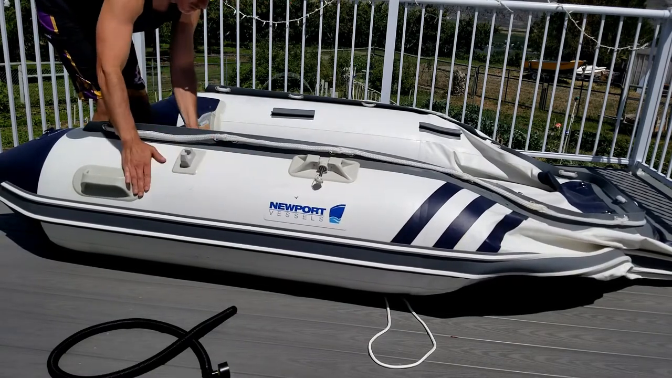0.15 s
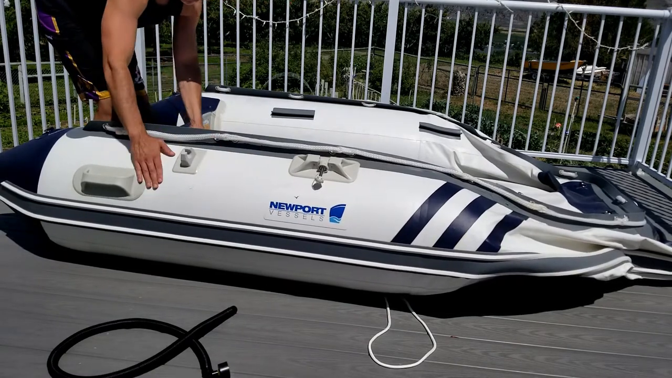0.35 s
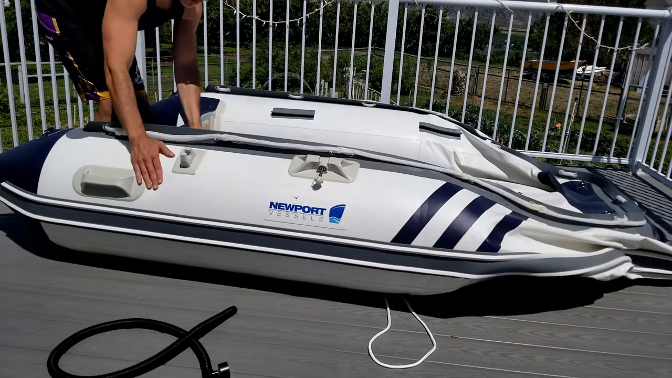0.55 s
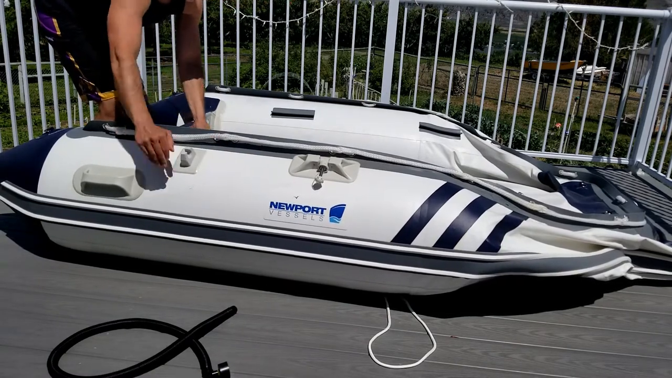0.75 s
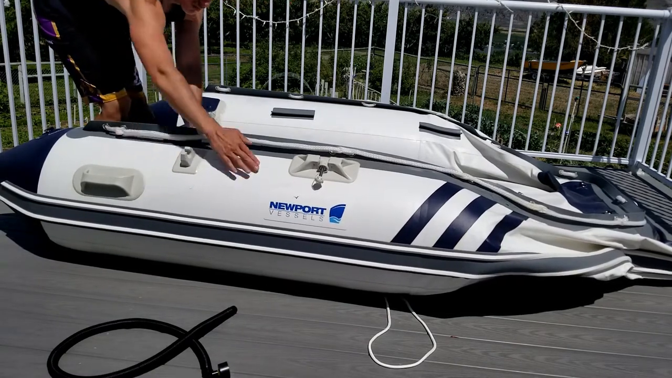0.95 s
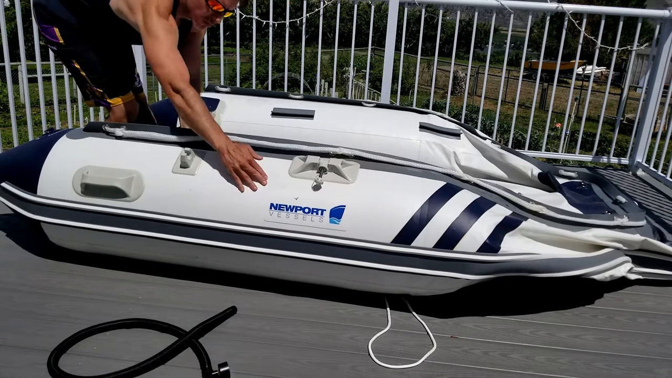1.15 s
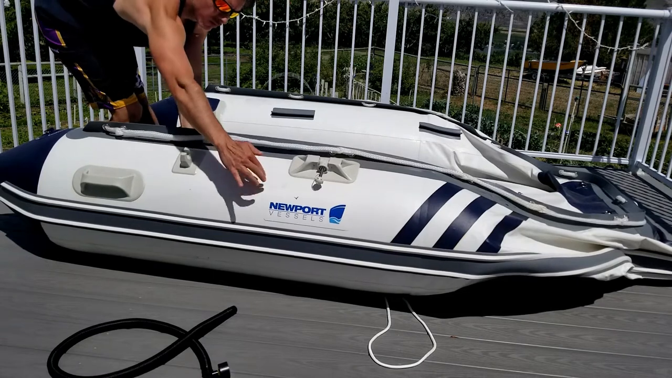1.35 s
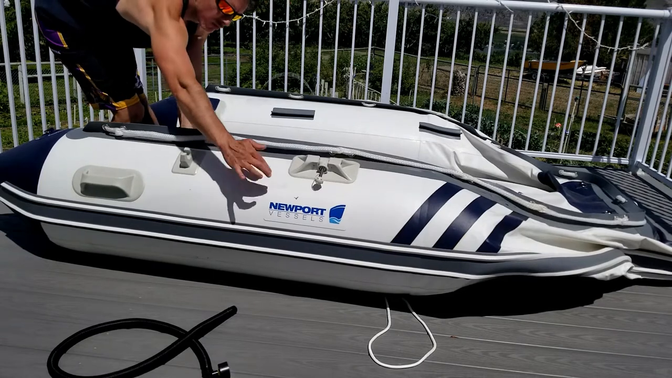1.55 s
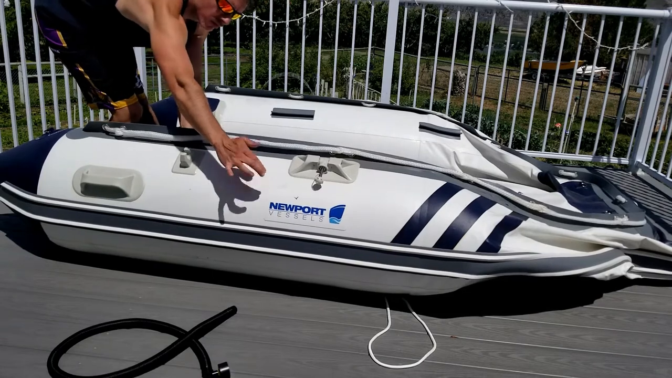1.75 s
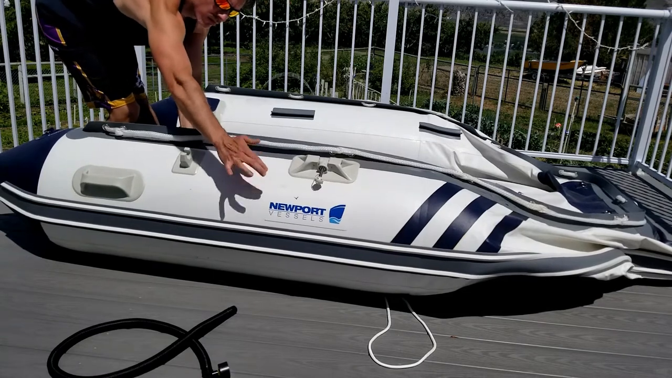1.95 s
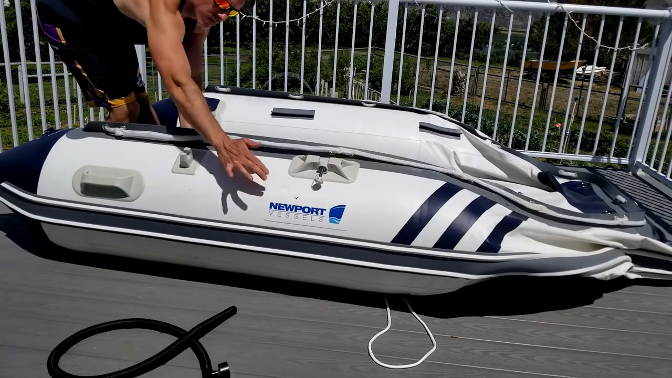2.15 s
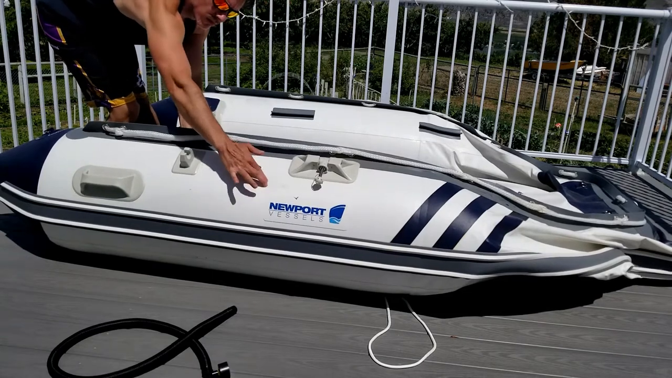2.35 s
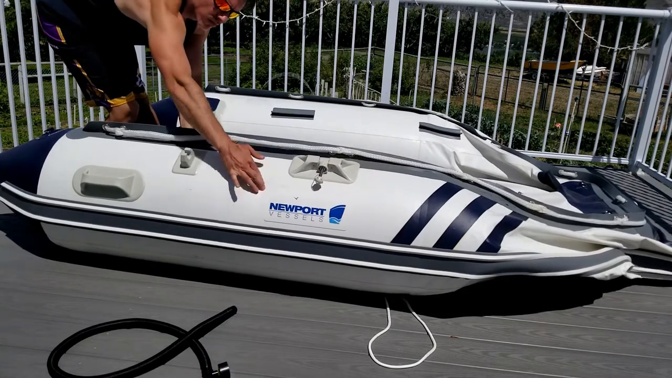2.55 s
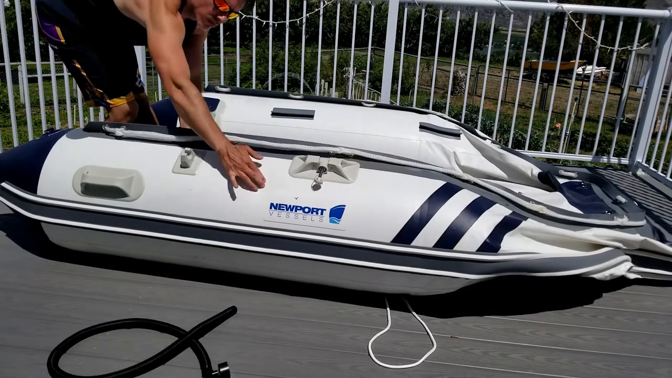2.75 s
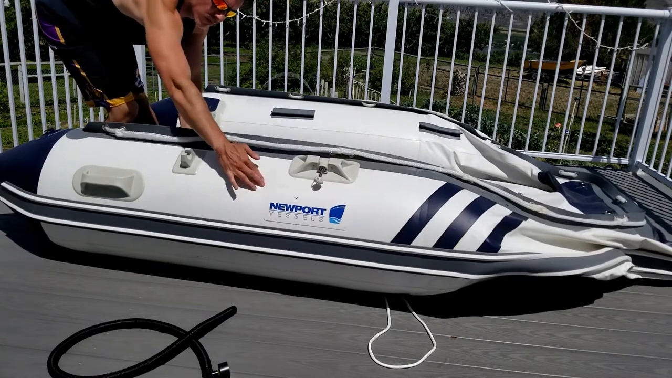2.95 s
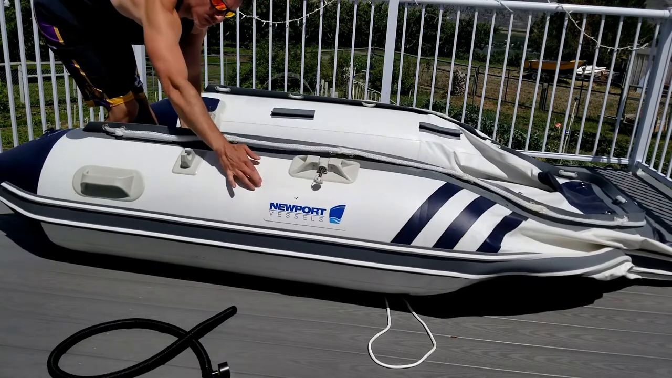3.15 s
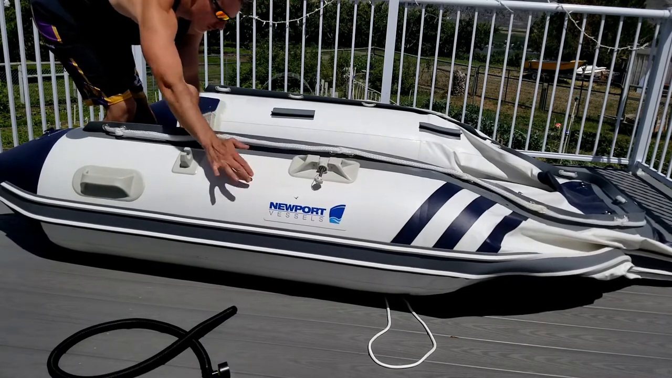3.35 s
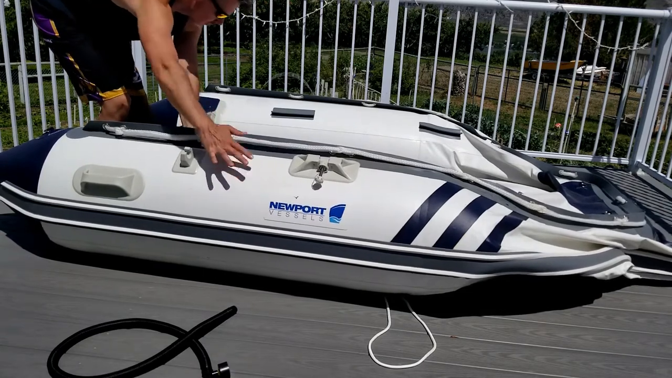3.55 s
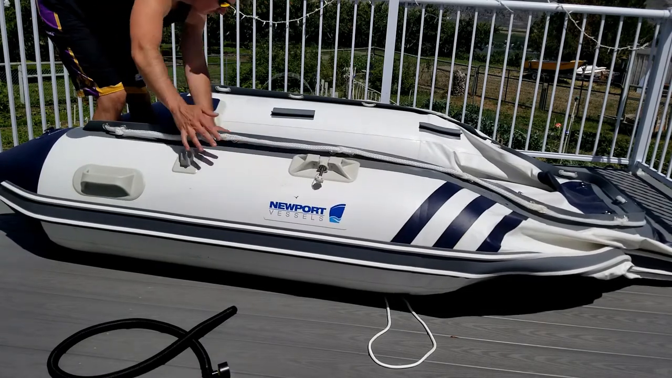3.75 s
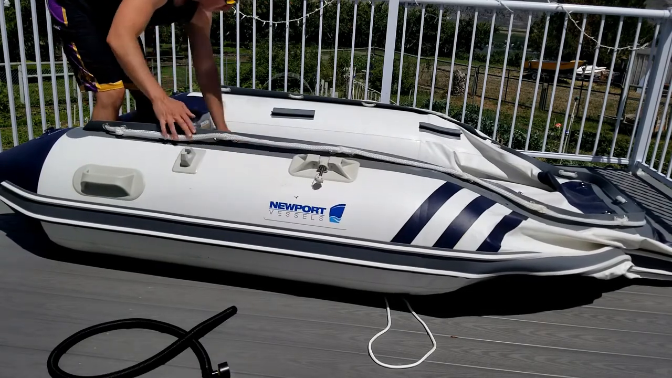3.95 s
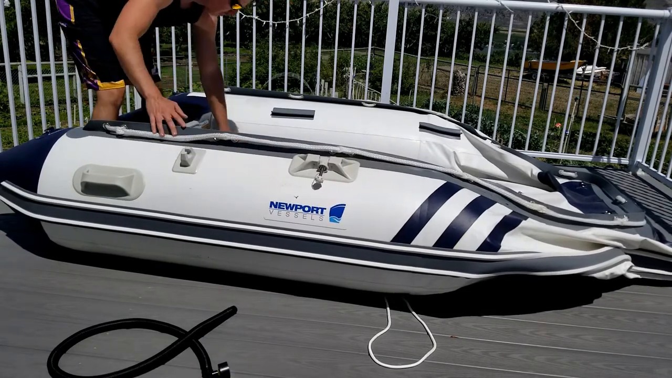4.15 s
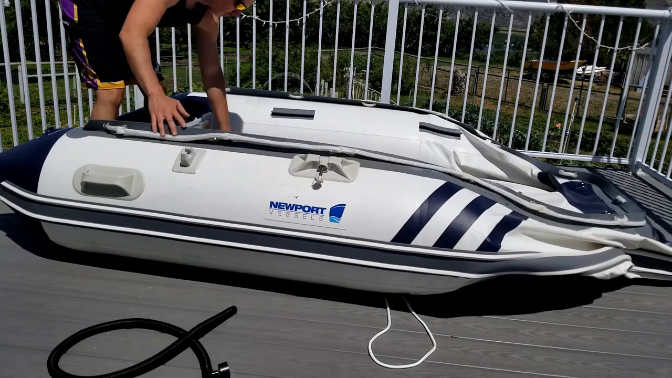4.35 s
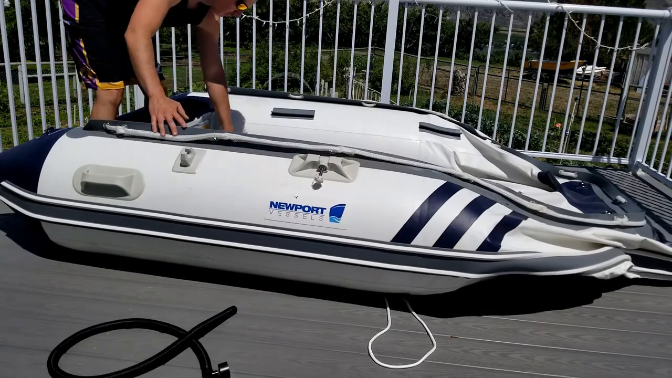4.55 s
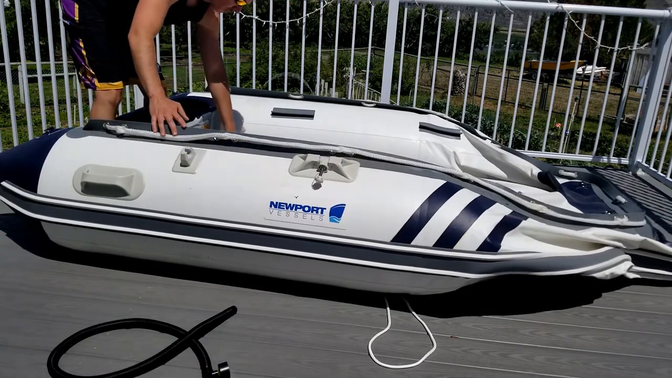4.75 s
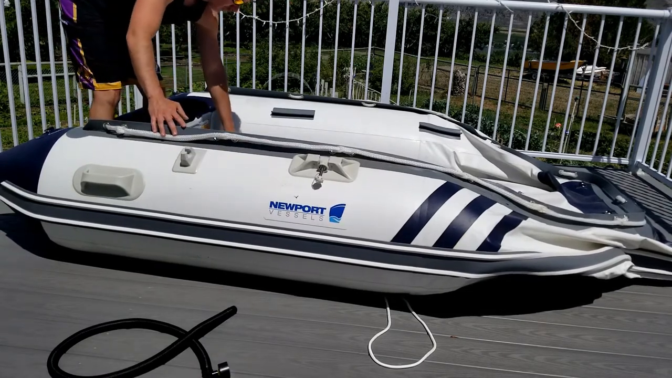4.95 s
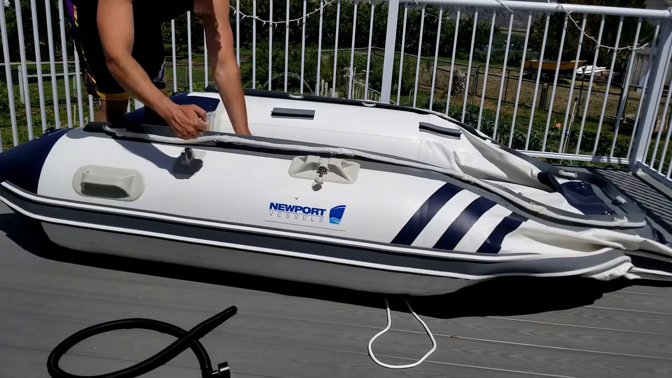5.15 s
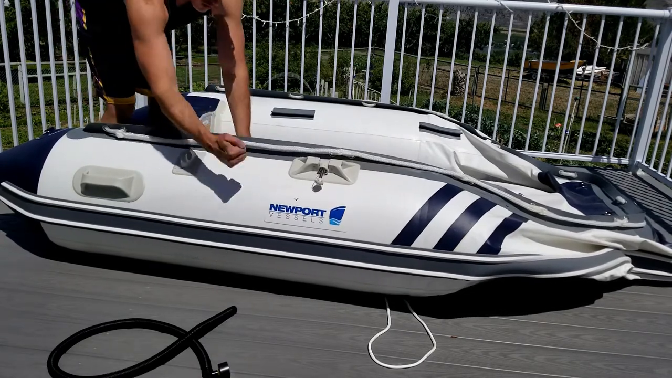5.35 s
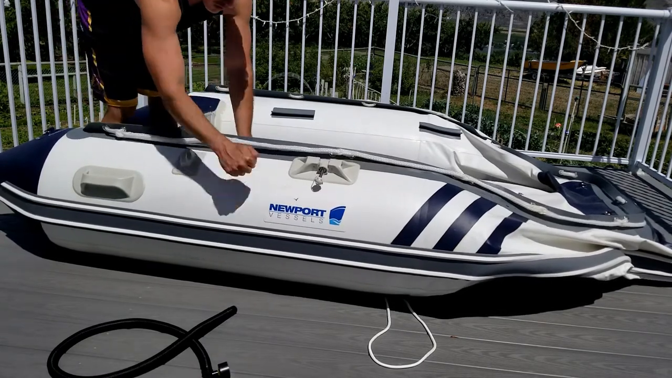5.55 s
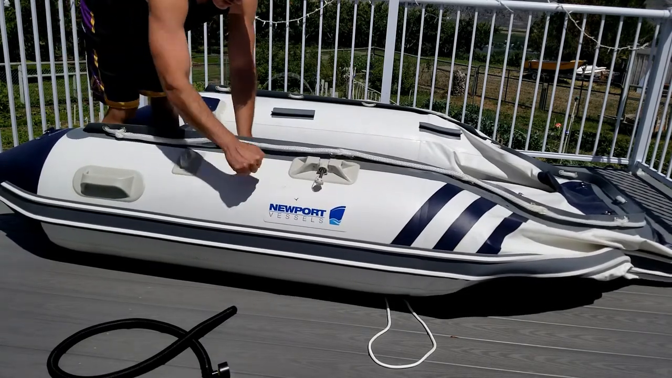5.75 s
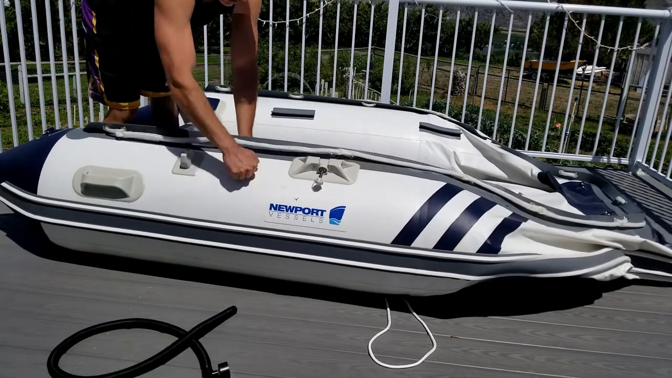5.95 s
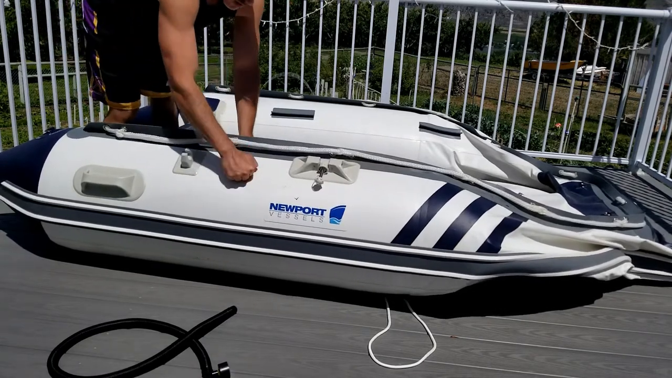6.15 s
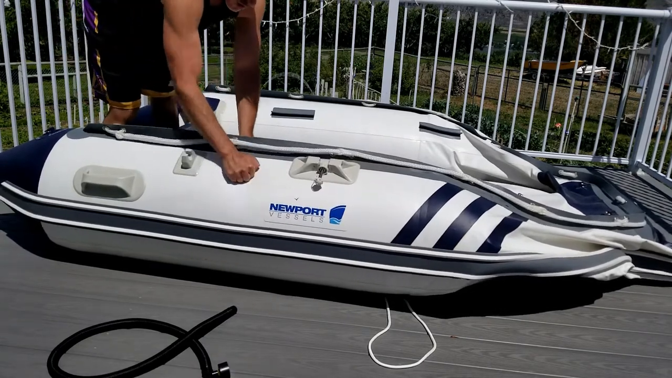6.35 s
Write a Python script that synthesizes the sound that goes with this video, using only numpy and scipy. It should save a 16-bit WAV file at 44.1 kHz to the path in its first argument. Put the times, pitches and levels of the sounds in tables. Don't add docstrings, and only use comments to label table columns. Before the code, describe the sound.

Outdoors on a deck, a small piston air pump buzzes loudly and evenly with a reedy, gritty tone. From about one second a hand pats a taut inflatable tube, roughly five times a second, with tiny metal clinks. The pump cuts off and slows into knocks. An abrupt change brings a faint muffled motor drone and five much louder, hollow fist slaps, with rattling fittings and a faint bird. Close stereo pickup, leaning left.

```python
import sys
import numpy as np
from scipy import signal
from scipy.fft import rfft, irfft, next_fast_len
from scipy.io import wavfile

SR = 44100
rng = np.random.default_rng(int(sys.argv[2]) if len(sys.argv) > 2 else 0)


def dump(signal):
    limited = np.clip(np.atleast_2d(signal).T, -1, 1)
    pcm = np.round(limited * 32767).astype(np.int16)
    wavfile.write(sys.argv[1], SR, pcm)


def volts_from_db(level):
    exponent = np.asarray(level, float) / 20
    return 10 ** exponent


N = 282681
CUT_S = 5.047
OFF_S = 4.71


# (time [s], rate [strokes/s])
PUMP_SPEED = [(0, 56.1), (.9, 56.15), (1.4, 56.09), (3.2, 56.06), (3.8, 56.11), (6.5, 56.1)]


def pump():
    coast_s = np.maximum(np.arange(N) / SR - OFF_S, 0)
    slowed = np.exp(-np.maximum(coast_s - .022, 0) / .42)
    pressure_loss_db = 14 * (1 - np.exp(-coast_s / .065))
    turn_rad = 2 * np.pi * np.cumsum(in_time(PUMP_SPEED)[0] * slowed + .06 * drift(6)) / SR
    stroke_db = -38 - pressure_loss_db - 20 * coast_s
    valve_db = -57.5 - 4 * coast_s
    tone = stroke_tone(turn_rad, coast_s, pressure_loss_db)
    return volts_from_db(stroke_db) * tone + volts_from_db(valve_db) * valve_hiss(turn_rad, slowed)


# (time [s], level [dB])
HAND_SHADE = [(0, -5.5), (.75, -5), (.95, 2), (2.2, 2.5), (3.65, 0), (4.2, 0), (4.71, -2.5)]


def stroke_tone(turn_rad, coast_s, pressure_loss_db):
    shade_db = in_time(HAND_SHADE)[0] + pressure_loss_db
    whine_db = 1 + 1.7 * pressure_loss_db - 400 * coast_s ** 2
    orders, levels_db = stroke_orders()
    valve_order, flank_lead_turns, thump_lead_turns = 13.8, .25, .3
    lead_turns = np.clip(.1 * (np.abs(orders - .5 - valve_order) - 1), 0, flank_lead_turns)
    lead_turns = np.where(orders < 6, thump_lead_turns, lead_turns * ((orders > 7) & (orders != 9)))
    phases = 2 * np.pi * np.cumsum(lead_turns)
    phases += 2 * np.pi * rng.random(len(orders)) * np.clip((orders - 19) / 12, 0, 1)
    shaded = (orders == 8) | (orders > 19) & (orders < 25)
    groups = shaded + 2 * (orders > 45)

    on = int((CUT_S + .01) * SR)
    group_gain = [np.ones(on), volts_from_db(shade_db[:on]), volts_from_db(whine_db[:on])]
    waver = [drift(4)[:on] for _ in range(11)]
    step, wave, tone = np.exp(1j * turn_rad[:on]), np.ones(on), np.zeros((2, N))
    for order, db, phase, group in zip(orders, levels_db, phases, groups):
        wave = wave * step
        waver_depth = min(.04 + .005 * order, .3)
        gain = volts_from_db(db) * group_gain[group] * (1 + waver_depth * waver[int(order) % 11])
        skew_rad, pan_db = min(order, 30) ** 2 * rng.standard_normal(2) * [.00035, .0022]
        side_phase = phase + np.array([[skew_rad], [-skew_rad]])
        sides = volts_from_db(pan_db * np.array([[1], [-1]])) * np.exp(1j * side_phase)
        sides *= 2 / np.abs(sides.sum())
        tone[:, :on] += sides.real * (gain * wave.real) - sides.imag * (gain * wave.imag)
    return tone


# (order [x stroke rate], level [dB])
LOW_ORDERS = [(1, -16), (2, -7), (3, -10), (4, -1), (5, -6), (6, -11), (7, -10), (8, -14), (9, -30),
              (10, -12), (11, -6), (12, -8), (13, -17), (14, 0), (15, -7), (16, -9), (17, -14), (18, -21),
              (19, -25), (20, -19), (21, -16), (22, -34), (23, -24), (24, -17), (25, -24), (26, -24),
              (27, -18), (28, -29), (29, -13.5), (30, -21)]


def stroke_orders():
    k = np.arange(31, 73)
    armature_db = 6.5 * ((k % 3 == 2) & (k < 45))
    db = np.maximum(-27.5 - 3 * (k - k[0]), -38.5) + armature_db
    db = db + 5 * np.exp(-((k - 57) / 4.5) ** 2)
    sideband = (k - 62) / 4
    db = np.where(sideband % 1 == 0, np.maximum(db, -27.5 - 3 * np.abs(sideband)), db)
    return np.transpose(list(LOW_ORDERS) + list(zip(k, db)))


# (frequency [Hz], density [dB/Hz])
VALVE_AIR = [(90, -4), (150, -6.5), (400, 0.5), (520, -12), (850, 4.5), (1100, -11.5), (1700, -3.5),
             (2600, -13.5), (3500, -11.5), (4300, -16.5), (7000, -19), (14000, -26.5), (15500, -38)]


def valve_hiss(turn_rad, slowed):
    hiss = banded_noise(VALVE_AIR, patchy_db=1.5) * volts_from_db(0.45 * np.cos(turn_rad - 1.1))
    hiss /= np.std(filtered(hiss[0], 2, [2500, 9000], "band"))
    top = filtered(hiss, 1, 3500, "high")
    return hiss - (1 - slowed ** 7) * top


# (time [s], peak [dB])
LAST_STROKES = [(4.74, -31), (4.76, -33), (4.779, -34), (4.799, -31), (4.824, -31), (4.849, -32),
                (4.873, -32), (4.899, -36), (4.932, -36), (4.957, -34), (4.992, -34), (5.029, -34)]
# (frequency [Hz], level [dB], t60 [s])
HOUSING_MODES = [(230, -9, .06), (370, -10, .06), (610, -14, .04), (785, -4, .07), (875, -3, .07),
                 (940, 0, .07), (1180, -17, .04), (1540, -12.5, .04), (2190, -24, .03)]


def knocks():
    s, db = np.transpose(LAST_STROKES)
    t, out = np.arange(int(0.0042 * SR)) / SR, np.zeros(N)
    spread_db = rng.normal(0, 1, (len(s), len(HOUSING_MODES)))
    for k, (hz, level_db, t60) in enumerate(HOUSING_MODES):
        lean_db = (hz == 940) * np.interp(s, [4.74, 4.96], [-11, 0])
        lean_db = lean_db + (hz == 875) * np.interp(s, [4.86, 4.96], [0, -15])
        puff = (-1) ** k * np.hanning(len(t)) * np.sin(2 * np.pi * hz * t)
        gains = volts_from_db(db + level_db + lean_db + spread_db[:, k] + 1)
        out += ring(contacts(s - .004, gains, puff), hz, t60)
    return out


# (time [s], fingers [dB], palm [dB], clink delay [s], clink [dB])
HAND_TAPS = [(1.365, -36, -60, 0.032, -43), (1.574, -29.5, -60, .031, -37.5),
             (1.763, -24.5, -31, 0.03, -43.5), (1.959, -23, -42, .031, -41),
             (2.143, -23, -28.5, .0305, -44), (2.327, -24, -33, .031, -60), (2.514, -21.5, -37, 0.029, -39),
             (2.698, -27, -31, .034, -40.5), (2.881, -25.5, -31, .037, -42.5),
             (3.096, -22.5, -33, 0.038, -55), (3.332, -22.5, -25, 0.031, -41)]
# (time [s], level [dB], whole-tube bulge [dB])
FIST_SLAPS = [
    (5.3429, -14.5, -8),
    (5.3508, -35, -19),
    (5.3741, -20, -7),
    (5.5766, -11.5, -2),
    (5.8055, -8, 1),
    (6.0362, -9, 0),
    (6.2701, -8.5, 2),
]


def touches():
    s, finger_db, palm_db = np.transpose(HAND_TAPS)[:3]
    fingers = zip(s, finger_db, 0 * s + 1.5)
    palms = zip(s + .0195, palm_db, 0 * s + 6)
    return np.transpose([*fingers, *palms, *FIST_SLAPS])


# (frequency [Hz], level [dB], t60 [s])
TUBE_MODES = [(79.4, 2, 0.075), (125.2, 1, 0.11), (197, -10.5, 0.16), (239.3, -5, 0.11), (290, 0, 0.06),
              (367.6, -18.5, 0.27), (392.7, -8.5, 0.11), (496.6, -3.5, 0.033), (618, -9, 0.099),
              (664, -33, 0.082), (764, -12, 0.059), (817, -18.5, 0.071), (808, -14.5, 0.053),
              (1040, -11, 0.047), (1280, -36, 0.02), (1840, -7, 0.025), (2150, -35, .04)]
# (delay [s], level [dB], signed gain [1])
END_ECHOES = [(0.01, -5.5, 0.044), (0.0181, -12, -1.2)]


def blows():
    s, db, bulge_db = touches()
    s = s + 0.00162
    hz, level_db, t60 = np.transpose(TUBE_MODES)[:, :, None]
    chance = rng.standard_normal((len(s), 2, len(TUBE_MODES), 1))
    t, body = np.arange(int(.3 * SR)) / SR, np.zeros(N + SR)
    bulge = hz < 150
    for at, blow_db, low_db, (spread, detune) in zip(s, db, bulge_db, chance):
        mode_db = blow_db + level_db + low_db * bulge + 2 * spread - 9.5
        gain = (2 * bulge - 1) * volts_from_db(mode_db - 60 * t / t60)
        modes = gain * np.sin(2 * np.pi * hz * (1 + 0.027 * detune) * t)
        i = int(at * SR)
        body[i:i + len(t)] += np.sum(modes, axis=0)
    touch = np.hanning(int(0.00072 * SR))
    direct = np.convolve(body, touch / touch.sum())[:N]
    body = direct.copy()
    for delay_s, echo_db, sign in END_ECHOES:
        lag = int(delay_s * SR)
        body[lag:] += sign * volts_from_db(echo_db) * direct[:-lag]

    crack = contacts(s, volts_from_db(db + 21), fading(0.0094)) * rng.standard_normal((2, N))
    grain_gain = volts_from_db(2.5 * np.minimum(rng.exponential(1, N), 4))
    grains = (rng.random(N) < 9000 / SR) * grain_gain * rng.standard_normal((2, N))
    rustle = contacts(s, volts_from_db(db + 43), fading(0.37)) * volts_from_db(1.7 * drift(58)) * grains
    shudder = contacts(s, volts_from_db(db + 58.5), fading(0.24)) * rng.standard_normal(N)
    body += filtered(shudder + 1e-18, 2, [170, 600], "band")
    return body + filtered(crack + rustle + 1e-18, 1, [1000, 3500], "band")


# (time [s], peak [dB])
FIST_CLINKS = [(5.3617, -44), (5.376, -33.5), (5.39, -46), (5.4143, -57), (5.4839, -42), (5.4974, -56),
               (5.5165, -54), (5.544, -43), (5.5968, -39), (5.6081, -40.5), (5.621, -49), (5.6492, -47),
               (5.8243, -37), (5.848, -45), (5.8721, -53), (5.9034, -48), (6.053, -34), (6.078, -46),
               (6.107, -48), (6.1266, -39), (6.286, -40), (6.2918, -39), (6.304, -45), (6.339, -45),
               (6.353, -37), (6.367, -49)]


def clink_rows():
    tap_s, _, _, lag_s, clink_db = np.transpose(HAND_TAPS)
    touch_s, touch_db = touches()[:2, :-len(FIST_SLAPS)]
    s = np.r_[tap_s + lag_s, tap_s + lag_s + .059, touch_s]
    db = np.r_[clink_db, clink_db - 14.5, touch_db - 27]
    is_tick = np.arange(len(s)) >= 2 * len(lag_s)
    taps = [s, db, 2 + 9 * is_tick, -16 + 6 * (s - tap_s[0])]

    fist_s = np.array([at for at, level_db, _ in FIST_SLAPS if level_db > -20])
    s, db = np.transpose(FIST_CLINKS)
    wait_s, spread = .06 * rng.random((len(s), 4)), rng.standard_normal((len(s), 4))
    chatter_db = db[:, None] - 12 - 102 * wait_s + 2 * spread
    s = np.r_[s, (s[:, None] + wait_s).ravel()]
    db = np.r_[db, chatter_db.ravel()]
    age_s = s - fist_s[np.searchsorted(fist_s, s) - 1]
    thin_db = 6 * (np.arange(len(s)) >= len(FIST_CLINKS))
    fist = [s, db, 5.5 - 150 * age_s - thin_db, -12 + 50 * age_s - thin_db]
    rows = np.c_[taps, fist]
    return rows[:, rows[0] < N / SR - .001]


# (frequency [Hz], level [dB], t60 [s])
FITTING_MODES = [(1860, -28, 0.013), (2810, -20, 0.015), (3300, 3, 0.0059), (4800, -4, 0.008),
                 (5370, 5.5, 0.0072), (6010, 10, 0.0093), (6900, 1.5, 0.0062), (8840, 15, 0.0041),
                 (10700, 8.5, 0.013), (11240, 7.5, 0.0077), (13500, -41, 0.0049)]


def clinks():
    s, db, low_db, upper_db = clink_rows()
    spread_db = rng.normal(0, 2.7, (len(s), len(FITTING_MODES)))
    rough, out = rng.standard_normal((2, N)), np.zeros((2, N))
    rough[1] = .75 * rough[0] + .6 * rough[1]
    for k, (hz, level_db, t60) in enumerate(FITTING_MODES):
        colour_db = low_db * (hz < 3800) + upper_db * (hz > 8100)
        gains = volts_from_db(db + level_db + colour_db + spread_db[:, k] + 18)
        out += ring(contacts(s, gains, fading(0.016)) * rough, hz, t60)
    snap = contacts(s, volts_from_db(db), fading(0.014)) * rough
    out += filtered(snap + 1e-18, 2, [3000, 13000], "band")
    return out * volts_from_db([[.7], [-.7]])


# (frequency [Hz], level [dB], width [Hz])
MOTOR_LINES = [
    (113, -48, 12),
    (188, -59, 16),
    (222, -56, 14),
    (340, -60.5, 25),
    (873, -71, 14),
]


def drone():
    t, out = np.arange(N) / SR, 0
    for hz, db, width_hz in MOTOR_LINES:
        gain = volts_from_db(db + 2.3 + 3.5 * drift(width_hz))
        out = out + gain * np.sin(2 * np.pi * hz * t + .9 * drift(width_hz))
    return out


# (start [s], length [s], from [Hz], to [Hz], level [dB])
BIRD_NOTES = [
    (5.15, .04, 3700, 3350, -71),
    (5.2, .05, 3950, 3700, -74),
    (5.52, .05, 3550, 3250, -70),
    (5.94, .15, 3720, 3560, -62),
    (6.15, .14, 4750, 5000, -70),
]


def bird():
    out = np.zeros(N)
    for start_s, length_s, from_hz, to_hz, db in BIRD_NOTES:
        n, i = int(length_s * SR), int(start_s * SR)
        glide_rad = 2 * np.pi * np.cumsum(np.linspace(from_hz, to_hz, n)) / SR
        out[i:i + n] += volts_from_db(db) * np.hanning(n) * np.sin(glide_rad)
    return out * volts_from_db(1.6 * drift(50))


# (frequency [Hz], density [dB/Hz])
OPEN_AIR = [(15, -7), (25, -2), (31, -16), (60, -12.5), (120, -18.5), (250, -26), (400, -27), (540, -36.5),
            (900, -36.5), (2000, -49), (4000, -49.5), (8000, -54.5), (13000, -53), (16000, -66)]


def air():
    return volts_from_db(-48.5) * rms_one(banded_noise(OPEN_AIR, patchy_db=1.0))


# (frequency [Hz], correlation [1])
SIDE_LIKENESS = [(30, 0.98), (200, 1), (1000, 0.14), (3000, 0.15), (12000, 0.028)]


def banded_noise(spectrum, patchy_db):
    out, edges = 0, 16000 / 2 ** np.arange(0, 9.7, .4)[::-1]
    edges = edges[edges > spectrum[0][0]]
    white = rng.standard_normal((2, 2, N))
    for k, (low, high) in enumerate(zip(edges, edges[1:])):
        mid, side = filtered(white[k % 2], 2, [low, high], "band")
        hz = np.sqrt(low * high)
        alike = np.clip(at_hz(SIDE_LIKENESS, hz), 0, 1)
        gain = volts_from_db(at_hz(spectrum, hz) + patchy_db * drift(3.8))
        out = out + gain * (np.sqrt(1 + alike) * mid + np.sqrt(1 - alike) * side * [[1], [-1]])
    return out


def filtered(x, order, hz, kind):
    return signal.sosfilt(signal.butter(order, hz, kind, fs=SR, output="sos"), x)


def rms_one(x):
    return x / np.sqrt(np.mean(x ** 2) + 1e-20)


def at_hz(points, hz):
    points_hz, values = np.transpose(points)
    return np.interp(np.log(hz), np.log(points_hz), values)


def in_time(rows):
    s, *columns = np.transpose(rows)
    return [np.interp(np.arange(N) / SR, s, c) for c in columns]


def drift(rate_hz):
    r = np.exp(-80 * np.pi * rate_hz / SR)
    slow = signal.lfilter([1], [1, -2 * r, r * r], rng.standard_normal(N // 40 + 2002))[2000:]
    return np.interp(np.arange(N) / 40, np.arange(len(slow)), rms_one(slow))


def ring(force, hz, t60):
    r, w = volts_from_db(-60 / (t60 * SR)), 2 * np.pi * hz / SR
    return signal.lfilter([0, np.sin(w)], [1, -2 * r * np.cos(w), r * r], force + 1e-18)


def contacts(times_s, gains, shape):
    force = np.zeros(N + len(shape))
    for s, gain in zip(times_s, gains):
        i = int(s * SR)
        force[i:i + len(shape)] += gain * shape
    return force[:N] / np.sum(np.abs(shape))


def fading(t60):
    return volts_from_db(-60 * np.arange(int(t60 * SR)) / (t60 * SR))


def scene():
    lean_db, lead_samples = 4.0, 2.8
    before = np.clip((CUT_S - np.arange(N) / SR) / .002, 0, 1)
    motors = before * (pump() + knocks()) + (1 - before) * drone()
    left, right = motors + blows() + clinks() + bird() + air()
    size = 2 * next_fast_len(N // 2 + 9)
    shift = np.exp(-2j * np.pi * np.arange(size // 2 + 1) * lead_samples / size)
    late = irfft(rfft(right, size) * shift, size)[:N]
    return np.array([left * volts_from_db(lean_db / 2), late * volts_from_db(-lean_db / 2)])


def roll_off(x):
    return signal.sosfilt(signal.butter(12, 16460, fs=SR, output="sos"), x)


def record(dry):
    rounded = .8 * np.tanh(dry / .8)
    mix = signal.sosfilt(signal.cheby2(12, 50, 16400, fs=SR, output="sos"), rounded)
    return roll_off(mix)


dry = scene()
out = record(dry)
dump(out)
```